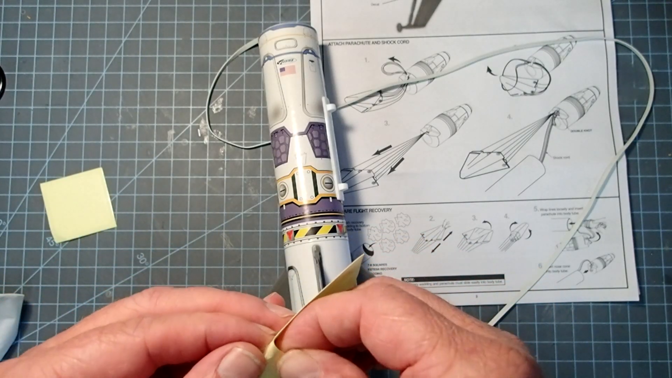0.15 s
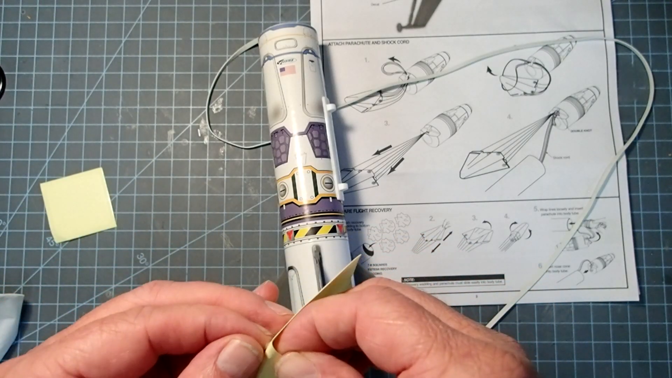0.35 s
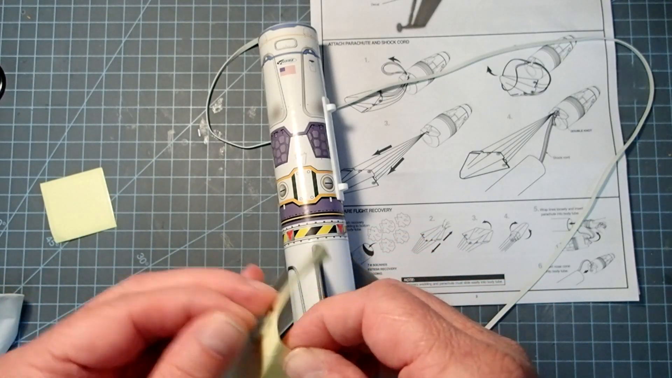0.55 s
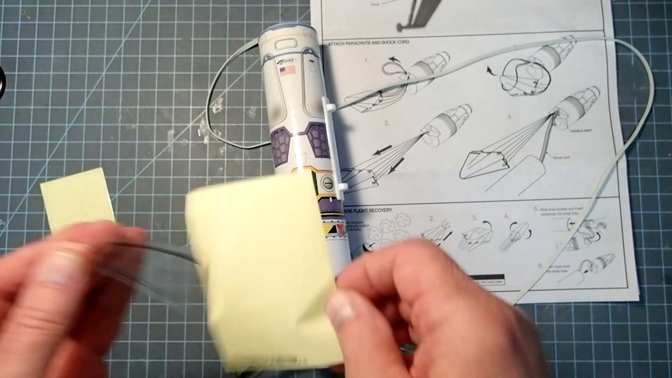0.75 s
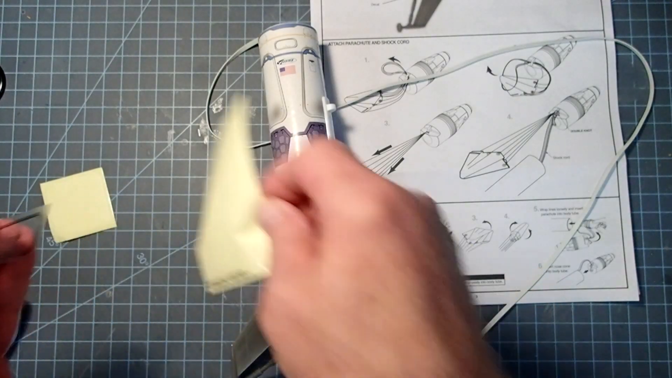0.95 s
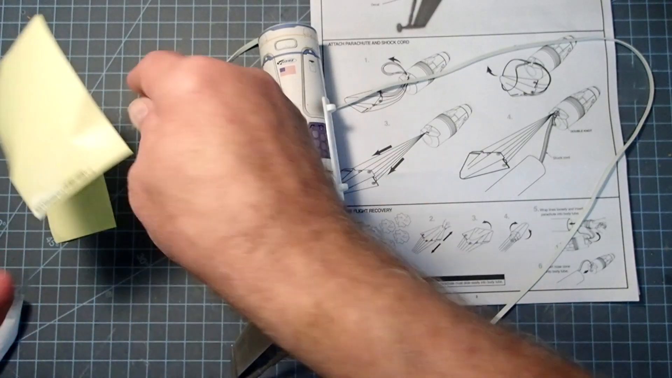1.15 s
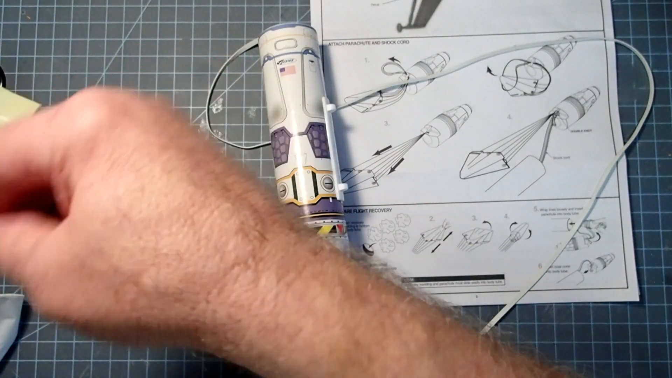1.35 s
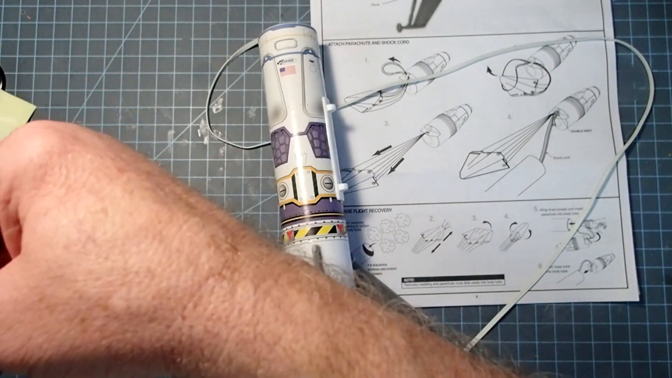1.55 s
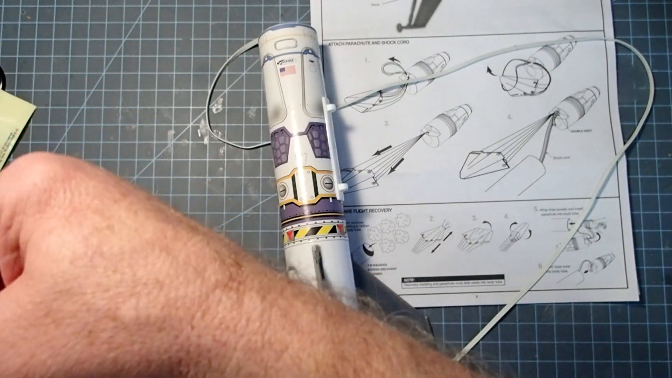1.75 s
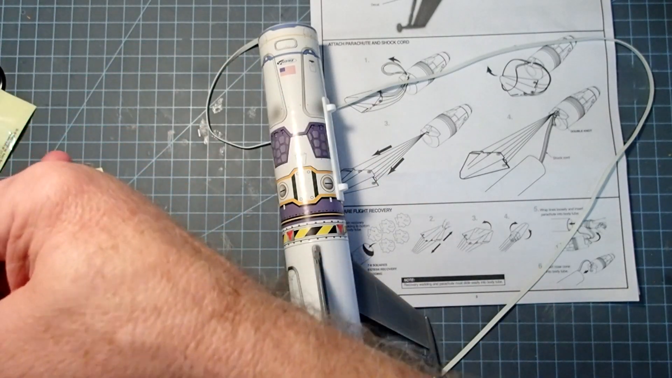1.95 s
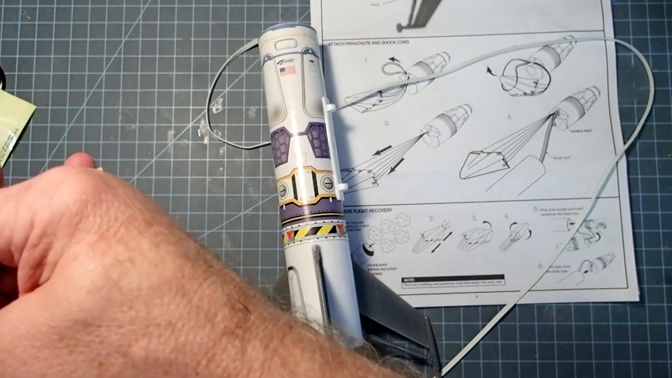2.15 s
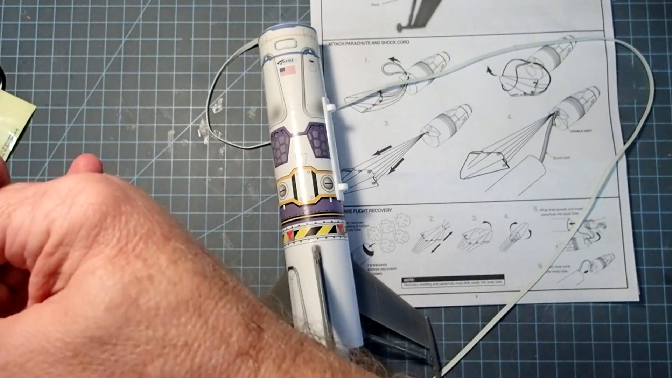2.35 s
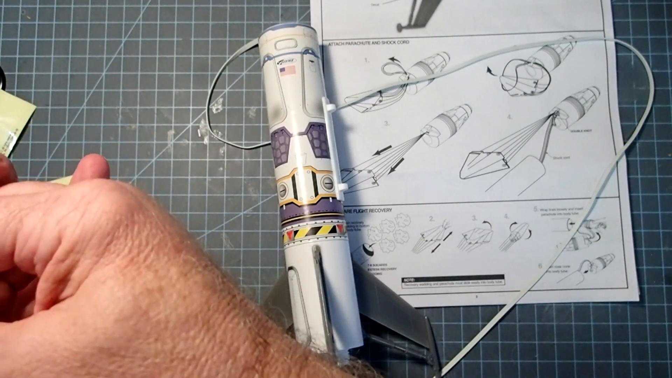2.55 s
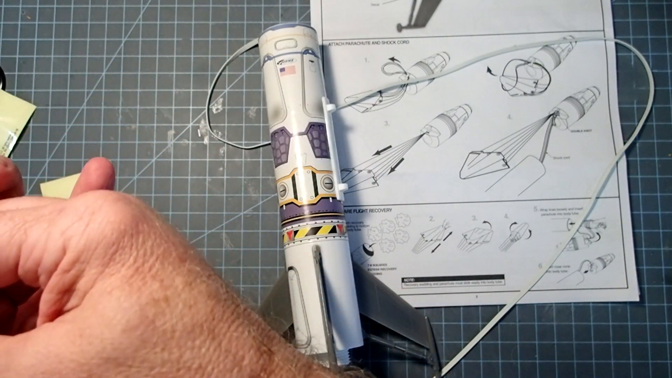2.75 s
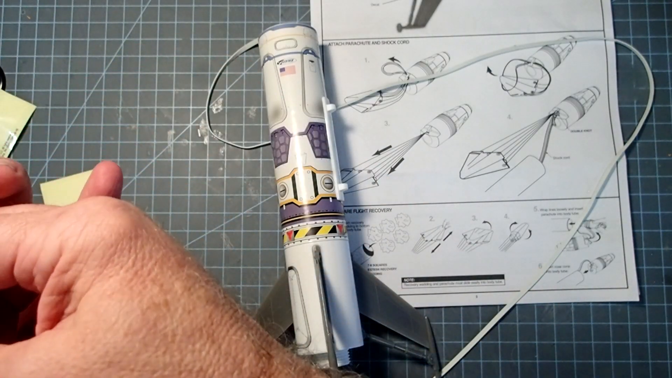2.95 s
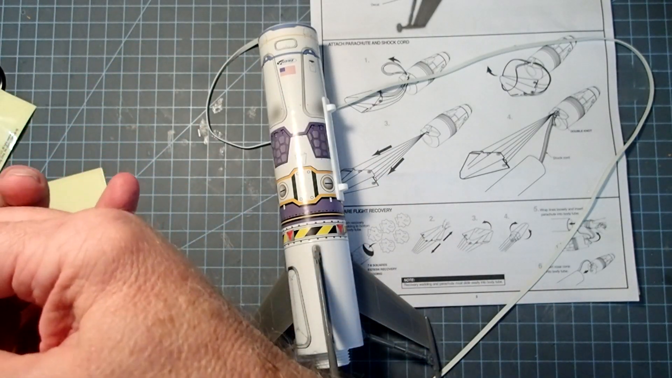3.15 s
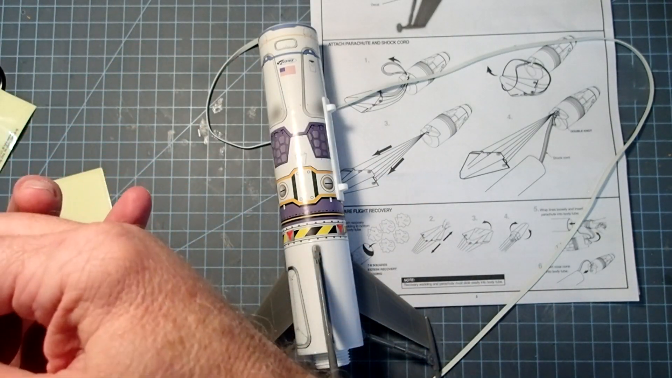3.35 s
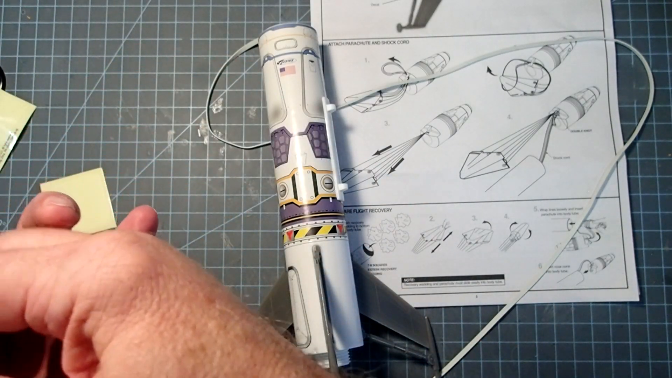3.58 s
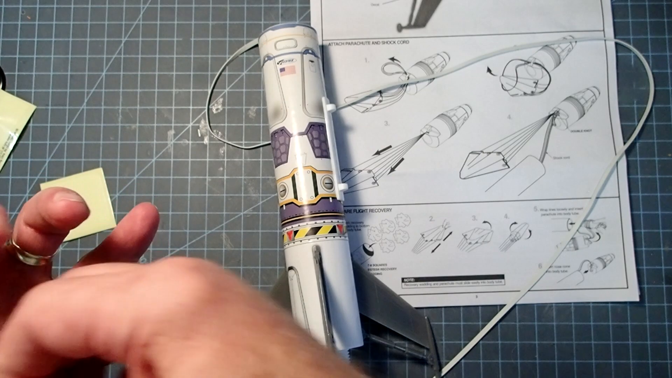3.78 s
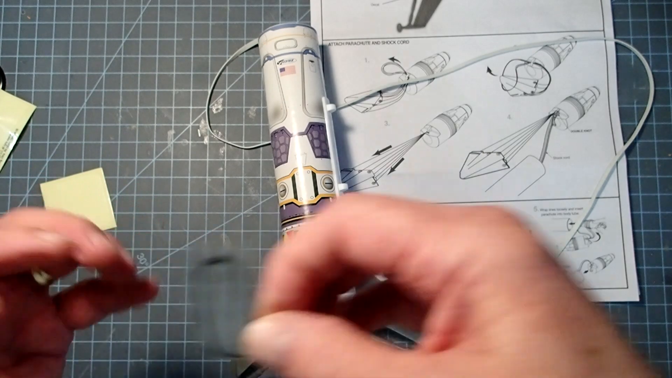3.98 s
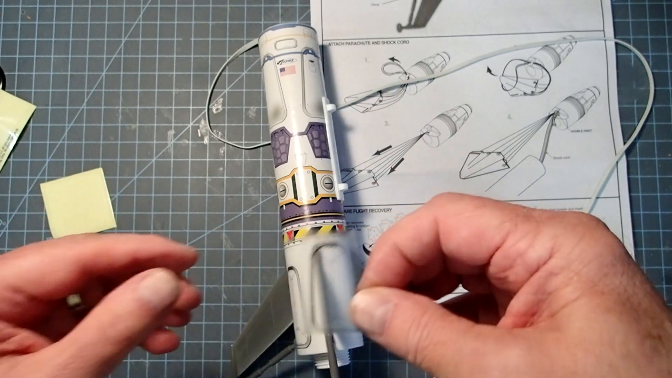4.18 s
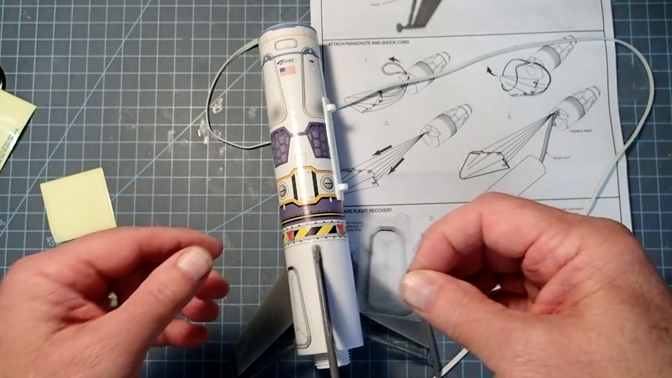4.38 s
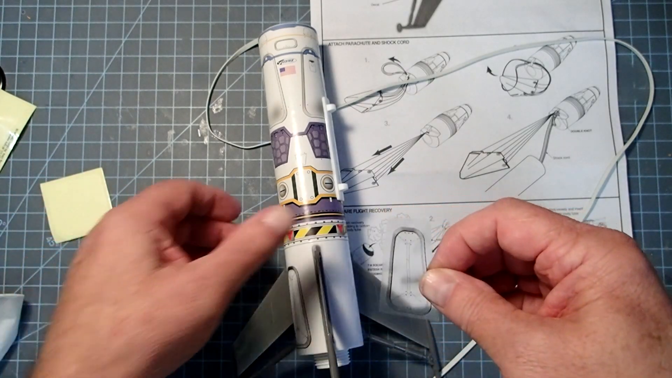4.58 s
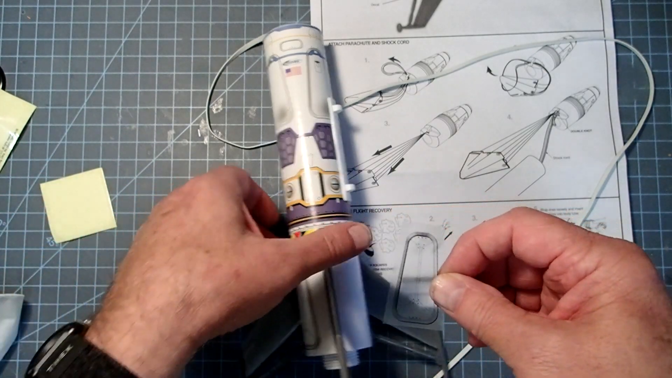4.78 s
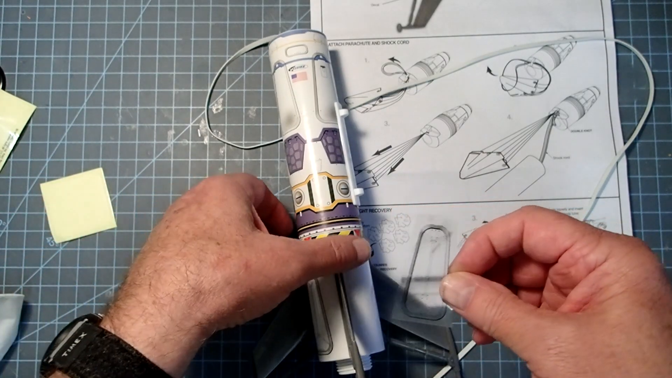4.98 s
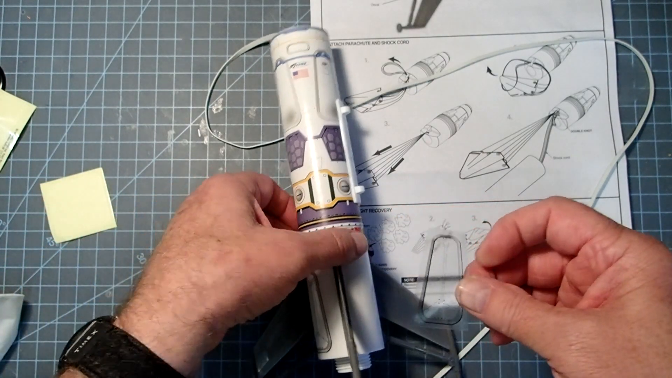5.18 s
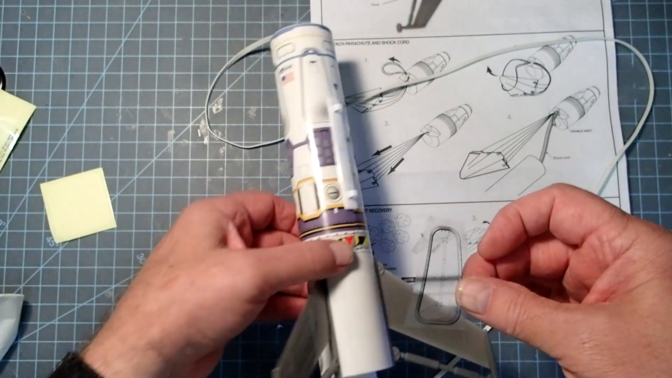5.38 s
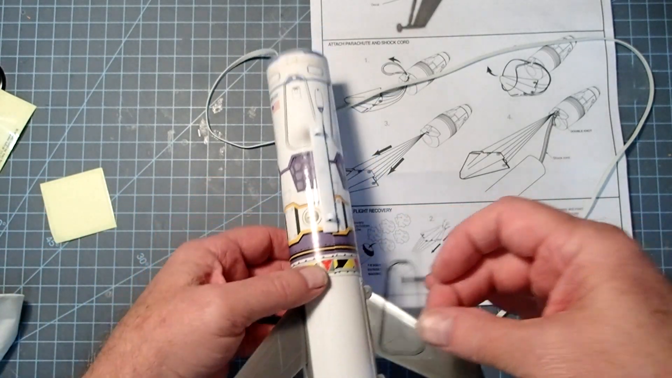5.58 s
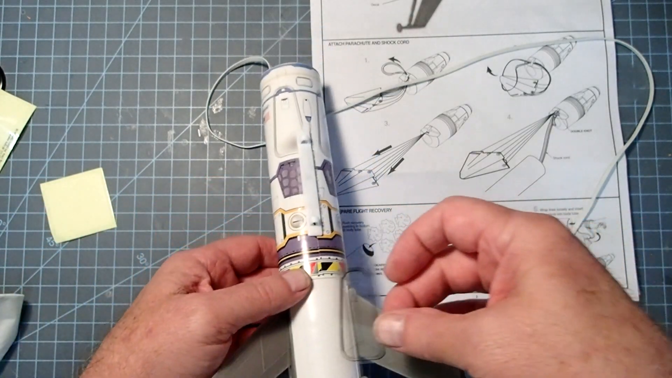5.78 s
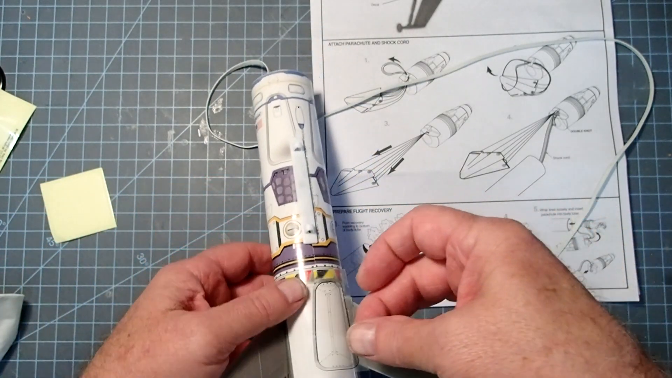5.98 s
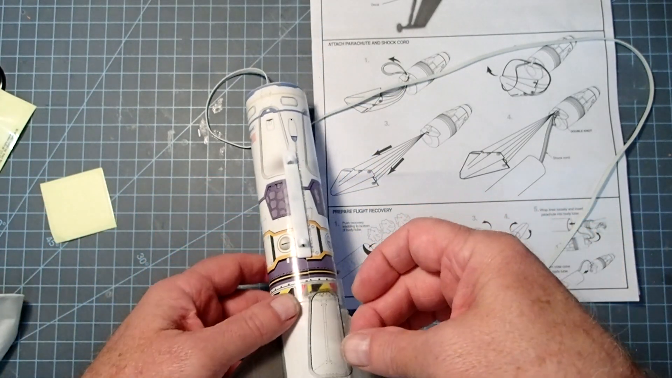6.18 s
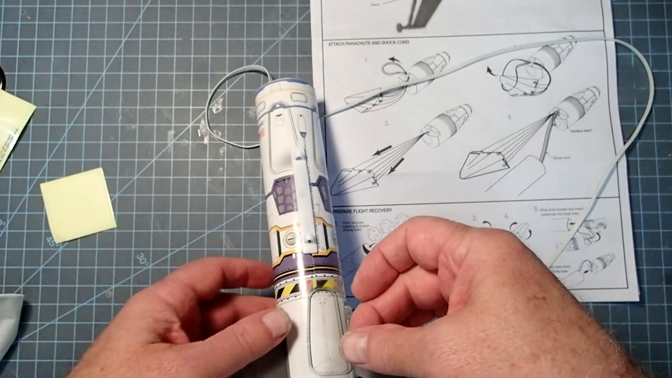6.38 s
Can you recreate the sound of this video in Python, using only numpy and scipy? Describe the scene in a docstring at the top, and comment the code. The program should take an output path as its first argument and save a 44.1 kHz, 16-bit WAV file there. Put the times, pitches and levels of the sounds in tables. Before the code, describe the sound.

A plastic sticker crinkles off its paper backing and snaps sharply, then a cardboard model rocket scrapes softly over a fan's hum.

```python
"""A desk in a small room, heard from close above on a small stereo microphone. A fan hums throughout.
First a clear sticker peels off its paper backing, rustling as it slides and crackling as it buckles.
At 1.3 s the backing drops on a cutting mat. More crinkles, then at 3.7 s the film snaps straight between
the fingers, right by the microphone. From 4.6 s a hand turns a cardboard model rocket on the desk: its
fins tick, its tube scrapes, knocks and rings. The room tone swells with each bit of handling."""
import sys
import numpy as np
from scipy import signal
from scipy.fft import rfft, irfft
from scipy.io import wavfile
from scipy.ndimage import uniform_filter1d

SR = 44100
rng = np.random.default_rng(int(sys.argv[2]) if len(sys.argv) > 2 else 0)


def dump_mix(stems):
    """Bounce the given channels to the path in sys.argv[1] as a 16-bit WAV at rate SR."""
    frames = np.atleast_2d(stems).T  # one column per channel
    limited = np.clip(frames, -1, 1)  # hard clip at full scale
    pcm = np.round(limited * 32767).astype(np.int16)
    wavfile.write(sys.argv[1], SR, pcm)


N = 283563
TIME, BINS_HZ = np.arange(N) / SR, np.arange(N // 2 + 1) * SR / N

# Room tone: the fan's air and a high hiss. Each row: frequency in Hz, relative level in dB.
FAN_AIR_COLOUR = [(20, -30), (55, -16.5), (120, -10), (230, -11), (400, -7.5), (620, -16), (900, -11.5),
                  (1500, -17.5), (2000, -24.5), (2600, -42.5), (3500, -80.5)]
HISS_COLOUR = [(2000, -61), (2600, -22.5), (4300, -18), (4900, -10), (6500, -1), (7500, -4.5), (8700, 0.5),
               (9500, -2), (10400, -11), (16000, -13)]
# Standing waves of the room. Each row: frequency in Hz, width in Hz, boost in dB.
ROOM_MODES = [(168.3, 7.3, 8.5), (210.2, 22, 7.5), (258.8, 9.6, 7.5), (319.3, 5.6, 10.5)]
# Fan and mains hum. Each row: frequency in Hz, relative level in dB.
HUM_TONES = [(119.5, -71.5), (360.2, -63), (420, -69), (560, -72), (816, -72.5), (915, -74.5)]
# How alike the room tone is in left and right. Each row: frequency in Hz, likeness from 0 to 1.
ROOM_TONE_LIKENESS = [(60, 0.9), (500, 0.67), (1400, 0.3), (3000, 0.1), (6000, 0)]
# Which parts of a sound make the room tone swell. Each row: frequency in Hz, weight in dB.
SWELL_SENSITIVITY = [(300, -13), (1200, -6.5), (3000, 0), (7000, 1.5), (12000, 2.5)]

# The backing sliding and flexing in the fingers. Each row: start in seconds, hold in seconds, level in dB.
SLIDES = [(.592, 0.051, -56), (.68, 0.038, -49), (.795, 0.059, -46.5), (1.125, 0.036, -62),
          (1.36, 0.053, -45), (3.2, 0.042, -69), (3.328, 0.048, -44), (3.54, 0.016, -58.5)]
# Film and backing buckling. Each row: start in seconds, crisp top in dB, body in dB, decay time in ms,
# left minus right of the top in dB.
CRINKLES = [(.5945, -36, -51, 5.9, -6), (.610, -35.5, -50, 3.4, -1), (.627, -38.5, -53, 7.6, -6),
            (.7071, -19, -37.5, 1.55, -3), (.762, -38.5, -53, 3, -3), (.7937, -31, -38.5, 4.4, -2),
            (.7987, -26, -43, 1.9, -4), (.8043, -27, -40, 2.3, -6), (.813, -35, -37.5, 4.6, 1),
            (.8275, -34, -36.5, 4.1, -4), (.8345, -24, -35, 4.9, -3), (.8385, -25, -40, 2.3, -6),
            (1.1472, -41, -51.5, 2, -2), (1.2463, -52.5, -54.5, 3.2, -2), (2.7842, -42.5, -55, 1.6, -6),
            (3.145, -50.5, -70, 3.3, -6), (3.2445, -50.5, -72, 4.2, -7), (3.3445, -25.5, -34, 4.7, 4),
            (3.3468, -16.5, -40, 3.2, -4), (3.403, -41.5, -41.5, 4.7, -7), (3.5253, -46, -56, 1.8, -4)]
# The crisp film and its duller paper. Each row: frequency in Hz, relative level in dB.
FILM_COLOUR = [(1500, -45), (2500, -17.5), (3200, -26.5), (4000, -19.5), (4650, -9), (5150, -2.5),
               (5800, -1.5), (6250, -4.5), (6700, 2), (7500, -7.5), (8500, -4), (9300, -10), (10200, -19.5),
               (13000, -20), (16000, -27.5)]
PAPER_COLOUR = [(30, -44), (100, -33.5), (300, -16), (650, -12.5), (1100, -5.5), (1700, 6), (2200, -11),
                (3200, -13.5), (6000, -35)]

# The backing card landing on the mat. Each row reads as in CRINKLES.
LANDINGS = [(1.3483, -29, -34, 4.3, -6), (1.3716, -20.5, -18.5, 2.2, -3.5), (1.3842, -26, -27.5, 3, -1),
            (1.398, -35, -42, 8.5, -2), (1.408, -35.5, -35.5, 6.3, -1), (1.443, -58, -40, 2.6, -2)]
# The card's edge and its body. Each row: frequency in Hz, relative level in dB.
CARD_EDGE_COLOUR = [(1500, -26), (2500, -1), (3100, -6.5), (4400, 5), (5100, 1.5), (6300, 5), (7600, 0.5),
                    (8500, 2), (9500, -7), (10500, -15), (16000, -19)]
CARD_BODY_COLOUR = [(30, -48), (100, -29), (300, -18), (700, -23), (980, -6), (1170, -6), (1400, 1),
                    (1600, 0), (1900, -11), (2400, -22), (5000, -45)]

# The bent film flicking straight. Each row: start in seconds, level in dB, left minus right in dB.
SNAPS = [(3.6876, -6, -2)]
# One give of that flick. Each row: frequency in Hz, relative level in dB.
SNAP_COLOUR = [(200, -38), (700, -31), (1300, -5.5), (1750, -14), (2200, -25.5), (3200, -30), (3950, -7.5),
               (4700, -3), (5300, 2), (6400, -1), (7400, -3.5), (8100, 3), (9200, -4.5), (10200, -20),
               (16000, -23.5)]
# The whole film ringing. Each row: frequency in Hz, relative level in dB, seconds to fall 60 dB.
FILM_MODES = [(1405, -1.5, 0.015), (1685, 10, 0.0083), (1910, -8.5, 0.014)]
# The film crackling as it settles from the flick. Each row reads as in CRINKLES.
SETTLING = [(3.6885, -21.5, -42, 4.9, -4)]

# The rocket's plastic fins ticking, with its cardboard as the body. Each row reads as in CRINKLES.
FIN_TICKS = [(4.5902, -44.5, -53, 3.6, -5), (4.8506, -48.5, -50, 3.7, -3), (5.1575, -28, -41, 4.8, -3),
             (5.212, -51, -60, 3.6, -5), (5.7638, -43.5, -46, 3.8, -5)]
# A fin's tick, the tube's wall and a fin's scratch. Each row: frequency in Hz, relative level in dB.
FIN_COLOUR = [(880, -38), (1500, -3), (2080, -6.5), (2540, -23.5), (3920, -10), (6630, -3), (7240, -16),
              (7920, -2.5), (11200, -28), (16000, -28)]
TUBE_WALL_COLOUR = [(40, -51), (120, -15.5), (350, -13), (740, -19.5), (1000, 4.5), (1200, 2.5),
                    (1600, -1.5), (2000, -11), (2250, -27), (3300, -27.5), (5700, -33), (9000, -38),
                    (10500, -53)]
SCRATCH_COLOUR = [(1500, -14), (2000, 1), (2500, -1.5), (3100, -13), (3900, -11), (4400, -1), (5700, 4.5),
                  (7400, -12.5), (9000, -2), (10500, -25)]
# The hand-damped tube ringing. Each row: frequency in Hz, relative level in dB, seconds to fall 60 dB.
TUBE_MODES = [(818, -14, .04), (988, -3, .035), (1085, -1, .03), (1242, 0, .04), (1360, -5, .03),
              (1510, -5, .03), (1850, -10, .025)]
# The tube rubbing the desk, and a fin scratching. Each row: start in seconds, hold in seconds, level in dB.
RUBS = [(4.85, 0.063, -50.5), (5.14, 0.12, -52), (5.332, 0.023, -45.5), (5.445, 0.026, -43),
        (5.53, .02, -60), (5.58, 0.027, -39.5), (5.65, 0.0082, -39.5), (5.75, .01, -57),
        (5.882, 0.0059, -45), (6.08, 0.21, -63.5)]
SCRATCHES = [(5.58, 0.0093, -49), (5.645, 0.01, -57)]
# The tube catching and knocking as it turns. Each row: start in seconds, level in dB.
KNOCKS = [(4.8507, -38), (5.102, -48), (5.6535, -27.5), (5.666, -31.5), (5.7639, -35), (5.883, -39)]

RUB_RISE_DB_PER_S, RUB_FALL_DB_PER_S = 342, 265


def undb(db):
    return 10 ** (np.asarray(db) / 20)


def unit_rms(x):
    return x / np.sqrt(np.mean(x ** 2))


def on_bins(points, size):
    """(Hz, value) points joined on a log axis, read at the FFT bins."""
    hz, value = np.transpose(points)
    return np.interp(np.log(np.arange(size // 2 + 1) * SR / size + 1), np.log(hz), value)


def response(colour, size=1024):
    """Causal impulse response of unit energy with the given colour."""
    cepstrum = irfft(np.log(undb(on_bins(colour, size))))
    cepstrum[1:size // 2] *= 2
    cepstrum[size // 2 + 1:] = 0
    impulse = irfft(np.exp(rfft(cepstrum)))
    return impulse / np.linalg.norm(impulse)


def bent(colour, detune=0.016, size=1024):
    """Response of a sheet whose resonances shift a little with the way it is bent."""
    shifted = [(hz * (1 + detune * rng.uniform(-1, 1)), db + rng.standard_normal()) for hz, db in colour]
    return response(shifted, size)


def ringing(modes, size=4096):
    """Decaying sines, together of unit energy; neighbouring modes swing against each other."""
    t = np.arange(size) / SR
    ring = sum((-1) ** k * undb(db - 60 * t / t60) * np.sin(2 * np.pi * hz * t)
               for k, (hz, db, t60) in enumerate(modes))
    return ring / np.linalg.norm(ring)


def through(x, impulse):
    return signal.fftconvolve(x, impulse)[:len(x)]


def at_level(x, db):
    """Scale so that the loudest 2 ms have this rms level."""
    return x * undb(db) / np.sqrt(uniform_filter1d(x ** 2, size=88).max())


def panned(x, pan_db):
    return x * undb(np.array([[pan_db], [-pan_db]]) / 2)


def add(out, start_s, x):
    i = int(start_s * SR)
    out[..., i:i + x.shape[-1]] += x[..., :N - i]


def wander(rate_hz):
    """Glides between random values, spread near 1."""
    step = int(SR / rate_hz)
    held = np.repeat(rng.standard_normal(N // step + 1), step)
    return 0.99 * uniform_filter1d(held, step)[:N]


def slips(per_s, scatter_db, size=N):
    """Tiny slips at random moments, uneven in strength."""
    hit = rng.random(size) < per_s / SR
    return hit * rng.choice([-1, 1], size) * undb(scatter_db * np.clip(rng.standard_normal(size), -2, 2))


def strokes(rows, rise_db_per_s, fall_db_per_s):
    """Gain of hand movements: each builds up, holds its level and dies away."""
    power = 0
    for start_s, hold_s, db in rows:
        before_db = rise_db_per_s * np.maximum(start_s - TIME, 0)
        after_db = fall_db_per_s * np.maximum(TIME - start_s - hold_s, 0)
        power += undb(db - np.minimum(before_db + after_db, 100)) ** 2
    return np.sqrt(power)


def stereo_noise(likeness, size, gain=1):
    """Left and right noise of rms 1 with the given likeness and gain per FFT bin."""
    mid, side = rfft(rng.standard_normal((2, size))) * gain
    mid, side = mid * np.sqrt(1 + likeness), side * np.sqrt(1 - likeness)
    return unit_rms(irfft(np.array([mid + side, mid - side]), size))


def room_tone(swell):
    """Fan air in the room's standing waves, its wavering hum and a high hiss, all swelling together."""
    likeness = np.clip(on_bins(ROOM_TONE_LIKENESS, N), 0, 1)
    standing_db = sum(db / (1 + (2 * (BINS_HZ - hz) / width) ** 2) for hz, width, db in ROOM_MODES)
    air = stereo_noise(likeness, N, undb(on_bins(FAN_AIR_COLOUR, N) + standing_db))
    air *= undb(-57 + 1.4 * wander(14))  # the level flickers
    hiss = stereo_noise(likeness, N, undb(on_bins(HISS_COLOUR, N))) * undb(-58.5 + 0.13 * wander(47))
    hum = sum(undb(db + 4.2 * wander(5.6)) * np.sin(2 * np.pi * hz * TIME + .5 * wander(5))
              for hz, db in HUM_TONES)
    return air * swell ** 0.86 + undb(-0.5) * hum * swell ** 0.85 + panned(hiss, -1.1) * swell ** 0.94


def swell_with(sound, threshold_db=-68.5, slope=0.39, ceiling_db=15, size=8192):
    """A gain that rises with the sound's short-term level, its treble above all, and a little ahead."""
    lead_s, rise_s, fall_s = 0.0096, 0.0083, 0.013
    sensed = irfft(rfft(sound.mean(axis=0)) * undb(on_bins(SWELL_SENSITIVITY, N)), N)
    lag_s = np.arange(-size, size + 1) / SR + lead_s
    window = np.exp(np.minimum(lag_s / rise_s, -lag_s / fall_s))
    power = np.abs(signal.fftconvolve(sensed ** 2, window / window.sum(), mode="same"))
    above_db = 10 * np.log10(1 + power / undb(threshold_db) ** 2)
    return undb(np.minimum(slope * above_db, ceiling_db))


def sticker_rustle():
    """Fine dense crackle of the film, and the duller rub of its paper, sliding between the fingers."""
    film = unit_rms(through(slips(4600, scatter_db=10.4), response(FILM_COLOUR)))
    paper = unit_rms(through(slips(3000, scatter_db=7), response(PAPER_COLOUR)))
    return (panned(film, -8) + undb(-9.5) * paper) * strokes(SLIDES, rise_db_per_s=476, fall_db_per_s=345)


def crackles(rows, top_colour, body_colour, first_slip_db, slips_per_s, size=4096):
    """Each buckle or contact is a brief avalanche of small gives that shake a stiff sheet and its body."""
    out, t = np.zeros((2, N)), np.arange(size) / SR
    for start_s, top_db, body_db, decay_ms, pan_db in rows:
        age = 1000 * t / decay_ms
        push = slips(slips_per_s, scatter_db=2.5, size=size) * age ** 0.19 * np.exp(-age ** 0.92)
        push[0] += undb(first_slip_db)
        top = at_level(through(push, bent(top_colour)), top_db)
        body = at_level(through(push, bent(body_colour)), body_db)
        add(out, start_s, panned(top, pan_db) + panned(body, 1.37))
    return out


def film_snap():
    """The film flicks straight in two gives a third of a millisecond apart and rings for an instant."""
    out, give = np.zeros((2, N)), response(SNAP_COLOUR, size=4096)
    flick = give + undb(-4) * np.roll(give, 14)
    for start_s, db, pan_db in SNAPS:
        ring = at_level(ringing(FILM_MODES), db - 18.5)
        add(out, start_s, panned(at_level(flick, db), pan_db) + panned(ring, 2.5))
    return out


def rocket_tube():
    """Stick-slip and soft knocks on the desk drive the cardboard wall and the tube's hollow resonances."""
    ring, wall = ringing(TUBE_MODES), response(TUBE_WALL_COLOUR, size=4096)
    grip = undb(wander(70))
    # the tube rubs at two places, each slipping on its own
    wall_rub = through(slips(3000, scatter_db=1.7) * grip, wall)
    ring_rub = through(slips(1600, scatter_db=4.7) * grip, ring)
    out = unit_rms(wall_rub + undb(-8) * ring_rub) * strokes(RUBS, RUB_RISE_DB_PER_S, RUB_FALL_DB_PER_S)
    contact = signal.windows.hann(20)  # soft cardboard stays in touch for half a millisecond
    for start_s, db in KNOCKS:
        knock = bent(TUBE_WALL_COLOUR, size=4096) + undb(-2) * np.roll(ring, rng.integers(20, 60))
        add(out, start_s, at_level(through(knock, contact), db))
    return panned(out, 0.99)


def fin_scratch():
    """To the right of the microphone, a fin scratches the instruction sheet during the hardest rubs."""
    scratch = unit_rms(through(slips(3200, scatter_db=3.5), response(SCRATCH_COLOUR)))
    return panned(scratch * strokes(SCRATCHES, RUB_RISE_DB_PER_S, RUB_FALL_DB_PER_S), -7)


def at_microphone(x, right_lag_s, desk_db, desk_decay_s, room_db=-17.5, room_t60_s=0.27, size=16384):
    """Direct sound reaches the left side first; the desk scatters it at once, the walls a little later."""
    t = np.arange(size) / SR
    direct = [x[0], irfft(rfft(x[1]) * np.exp(-2j * np.pi * BINS_HZ * right_lag_s), N)]
    likeness = on_bins([(1500, 1.0), (6000, 0.54), (10000, 0.47)], size)
    desk = (t > .0008) * np.exp(-t / desk_decay_s)
    walls = np.clip(t / 0.028, 0, 1) ** 2 * np.exp(-np.log(1000) * t / room_t60_s)
    envelope = undb(desk_db) * desk / np.linalg.norm(desk) + undb(room_db) * walls / np.linalg.norm(walls)
    echoes = envelope * stereo_noise(likeness, size)
    return np.array([channel + through(channel, echo) for channel, echo in zip(direct, echoes)])


def scene():
    """Handling down by the desk, the snap up by the microphone, and room tone swelling with both."""
    peel = crackles(CRINKLES, FILM_COLOUR, PAPER_COLOUR, first_slip_db=-19, slips_per_s=8900)
    landing = crackles(LANDINGS, CARD_EDGE_COLOUR, CARD_BODY_COLOUR, first_slip_db=-21, slips_per_s=8700)
    fins = crackles(FIN_TICKS, FIN_COLOUR, TUBE_WALL_COLOUR, first_slip_db=-4, slips_per_s=7750)
    handling = sticker_rustle() + peel + landing + fins + rocket_tube() + fin_scratch()
    handling = at_microphone(handling, right_lag_s=15e-6, desk_db=-5, desk_decay_s=.0035)
    settling = crackles(SETTLING, FILM_COLOUR, PAPER_COLOUR, first_slip_db=-18, slips_per_s=8930)
    snap = at_microphone(film_snap() + settling, right_lag_s=26e-6, desk_db=-13, desk_decay_s=.005)
    swell = swell_with(handling + undb(-21.5) * snap)  # the snap is so brief that it counts for less
    return handling + snap + room_tone(swell)


def record(dry, top_hz=15900):
    """The recorder clips at full scale and cuts the top."""
    lowpass = signal.ellip(10, .2, 60, top_hz, fs=SR, output="sos")
    return signal.sosfilt(lowpass, np.clip(dry, -1, 1))


dry = scene()
out = record(dry)
dump_mix(out)
```